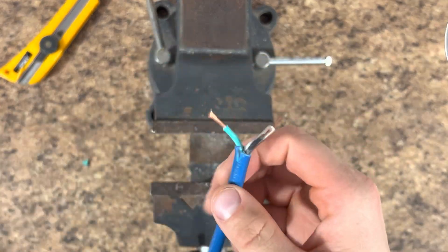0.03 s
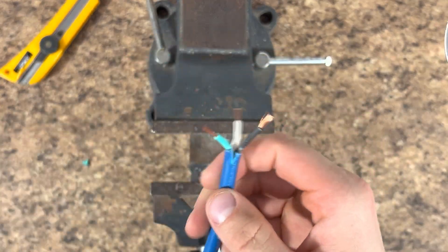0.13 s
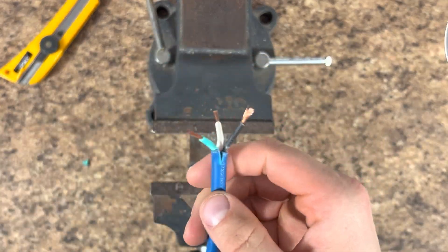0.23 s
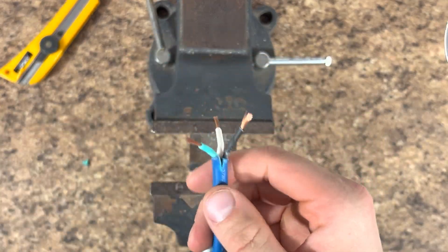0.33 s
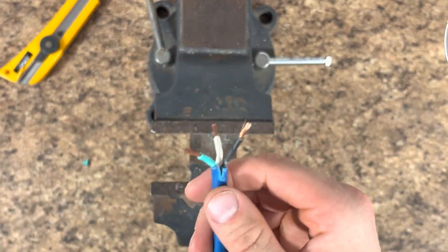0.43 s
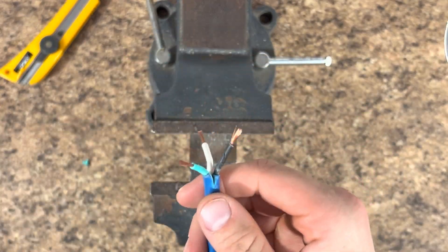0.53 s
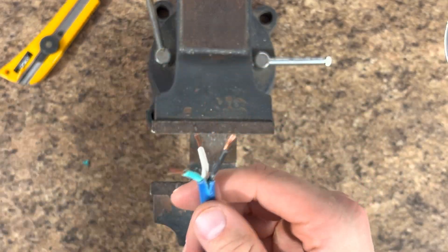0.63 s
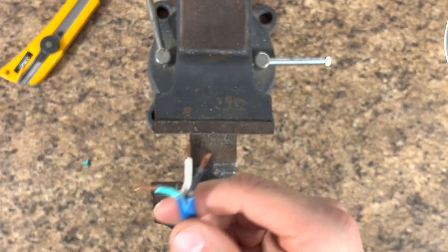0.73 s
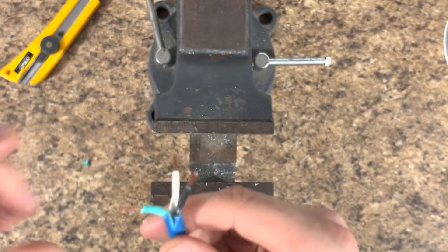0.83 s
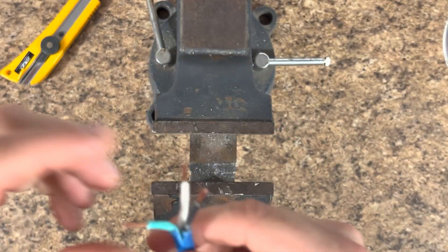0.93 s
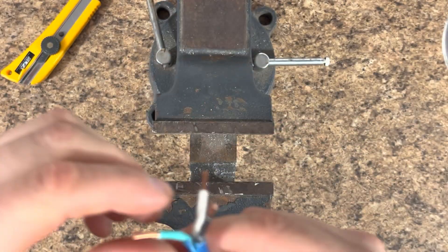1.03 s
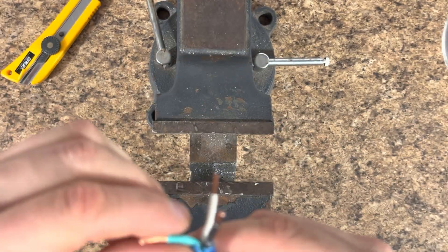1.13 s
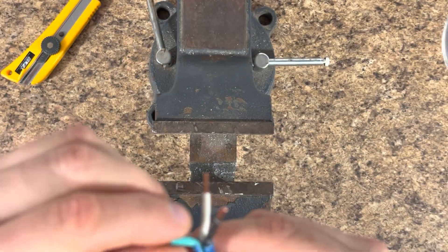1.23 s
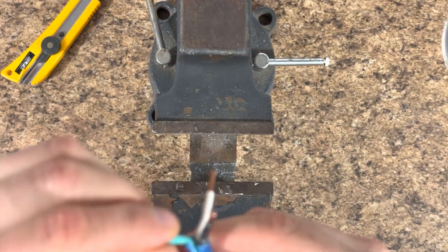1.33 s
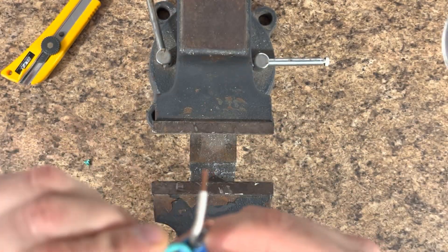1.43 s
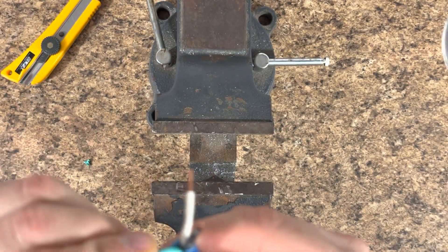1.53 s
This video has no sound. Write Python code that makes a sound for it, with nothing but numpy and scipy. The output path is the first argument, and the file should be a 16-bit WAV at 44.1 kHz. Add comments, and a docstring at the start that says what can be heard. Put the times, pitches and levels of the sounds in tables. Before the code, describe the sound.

A hand tool is put down hard on a workbench with one sharp, thumping clack and brief room ring; then soft settling knocks and faint wire ticks, close stereo microphone, low machine hum behind.

```python
"""A hand tool is put down hard on a workbench and settles: each touch cracks as noise and rings fading sines.
Fingers then twist bare wire strands, which tick as tiny high sines with a short hiss; soft knocks of fingers,
cable and the settling tool are noise puffs. A small workshop rings briefly, as fading noise. A machine hums low
behind, a wavering sine, over a deeper rumble and a bed of shaped noise. A pair of close microphone ports hears it."""
import sys
import numpy as np
from scipy import signal
from scipy.fft import rfft, irfft, next_fast_len
from scipy.io import wavfile

SR = 44100
rng = np.random.default_rng(int(sys.argv[2]) if len(sys.argv) > 2 else 0)


def pcm_store(signal):
    """Save signal as 16-bit PCM."""
    levels = np.round(np.clip(np.atleast_2d(signal), -1, 1) * 32767)
    wavfile.write(sys.argv[1], SR, levels.astype(np.int16).T)


def to_linear_factor(level_db):
    """Convert decibel levels (scalar or array-like) to linear amplitude factors."""
    exponent = np.asarray(level_db, float) / 20
    return 10 ** exponent


N = 68355

MODE_SPREAD_DB = 1  # random difference in level from one ringing to the next


def at_hz(points, hz):
    """Read a table of (pitch_hz, value) at any pitch, along a logarithmic pitch axis."""
    points = np.array(points)
    return np.interp(np.log(np.maximum(hz, 1)), np.log(points[:, 0]), points[:, 1])


def drift(rate_hz):
    """Slow random wandering with a spread of 1: noise smoothed twice, made at every 40th sample."""
    r = np.exp(-2 * np.pi * rate_hz * 40 / SR)
    noise = rng.standard_normal(N // 40 + 2002)
    slow = signal.lfilter([1], [1, -2 * r, r * r], noise)[2000:]  # skip the start-up
    return np.interp(np.arange(N) / 40, np.arange(len(slow)), slow / slow.std())


def clicks(start_s, gain):
    """A train of single-sample clicks in near silence."""
    out = np.full(N, 1e-18)
    out[(np.asarray(start_s) * SR).astype(int)] = gain
    return out


def ring(x, hz, t60_s):
    """Each click sets off a sine that falls 60 dB in t60_s; a click of 1 starts it at height 1."""
    r = to_linear_factor(-60 / (t60_s * SR))
    w = 2 * np.pi * hz / SR
    return signal.lfilter([0, np.sin(w)], [1, -2 * r * np.cos(w), r * r], x)


def fade(x, t60_s):
    """Each click becomes an envelope that falls 60 dB in t60_s."""
    return signal.lfilter([1], [1, -to_linear_factor(-60 / (t60_s * SR))], x)


def band_pass(x, order, low_hz, high_hz):
    """Keep only the sound between two pitches."""
    return signal.sosfilt(signal.butter(order, [low_hz, high_hz], "band", fs=SR, output="sos"), x)


def colour(noise, spectrum):
    """Shape noise by a table of (pitch_hz, level_db), then bring its rms to 1."""
    gain = to_linear_factor(at_hz(spectrum, np.fft.rfftfreq(N, 1 / SR)))
    out = irfft(rfft(noise) * gain, N)
    return out / out.std()


def bands():
    """Third-octave bands of stereo noise, each with its centre, partly alike at the two ports."""
    # likeness of diffuse sound at the two ports: pitch [Hz], likeness [0-1]
    likeness = [(60, 0.96), (200, 0.76), (400, 1), (700, 0), (1200, 0.4), (1700, 1), (2100, 1),
                (3500, 0.88), (7000, 0.9), (16000, .97)]
    edges_hz = 22 * 2 ** np.arange(0, 9.7, 1 / 3)
    white = rng.standard_normal((2, 2, N))  # neighbouring bands take turns with two noises
    for k, (low, high) in enumerate(zip(edges_hz, edges_hz[1:])):
        mid, side = band_pass(white[k % 2], 2, low, high)
        hz = np.sqrt(low * high)
        alike = np.clip(at_hz(likeness, hz), 0, 1)
        yield hz, np.sqrt(1 + alike) * mid + np.sqrt(1 - alike) * side * [[1], [-1]]


def air():
    """Workshop air: a bed of noise whose bands each wander slowly in level."""
    # colour of the air: pitch_hz [Hz], relative level_db [dB per Hz]
    air_colour = [(25, -28.5), (45, -23.5), (65, -8), (100, 1.5), (180, -6.5), (350, -12.5), (600, -22.5),
                  (1400, -23.5), (2600, -33.5), (4000, -49.5), (5500, -68), (8000, -53), (12000, -54),
                  (15500, -44), (17000, -82.5)]
    level_db, patchy_db = -49, 2.5
    out = sum(noise * to_linear_factor(at_hz(air_colour, hz) + patchy_db * drift(2.9)) for hz, noise in bands())
    return to_linear_factor(level_db) * out / out.std()


def tone(rows, hz, wander_hz, rate_hz):
    """A low sine that follows a table of (start_s, rms level_db) and wanders in pitch."""
    level_db = np.interp(np.arange(N) / SR, *np.transpose(rows))
    turns = np.cumsum(hz + wander_hz * drift(rate_hz)) / SR
    return np.sqrt(2) * to_linear_factor(level_db) * np.sin(2 * np.pi * turns)


def rumble():
    """A deep tone that swells and sinks."""
    # rumble level in two stretches: start_s [s], level_db before panning [dB]
    swells = [
        [(0.0, -54), (0.036, -60), (0.084, -63), (0.114, -53), (0.136, -76), (0.2, -72)],
        [(0.5, -50.5), (0.61, -59), (0.63, -61), (0.756, -39.5), (0.848, -54), (0.87, -62.5), (0.946, -50.5),
         (1.528, -57.5), (1.55, -66.5)],
    ]
    return tone(swells[0] + swells[1], hz=58, wander_hz=4.6, rate_hz=11.0)


def hum():
    """The machine's hum: a low tone that wavers in level and pitch."""
    # hum level in two stretches: start_s [s], level_db before panning [dB]
    wavers = [
        [(0.0, -44.5), (0.024, -45), (0.05, -45), (0.084, -51.5), (0.11, -37.5), (0.136, -38.5), (0.182, -44.5),
         (0.21, -60), (0.22, -43)],
        [(0.45, -47.5), (0.474, -56.5), (0.538, -41.5), (0.658, -45), (0.694, -58), (0.722, -41.5),
         (1.016, -42.5), (1.404, -47.5), (1.442, -40.5), (1.478, -49), (1.55, -42.5)],
    ]
    return tone(wavers[0] + wavers[1], hz=128.1, wander_hz=1.5, rate_hz=3.6)


def room(x):
    """The workshop's reverberation: noise that dies band by band, set off by the sound x."""
    # time each band takes to fall 60 dB: pitch_hz [Hz], t60_s [s]
    band_t60 = [(100, 0.68), (400, 0.37), (1100, .45), (3000, 0.39), (5000, 0.34), (8000, 0.33),
                (11000, 0.32), (16000, 0.24)]
    # starting strength of the reverberation: pitch_hz [Hz], relative level_db [dB]
    band_level = [(60, -26.5), (130, -0.5), (250, 5), (500, 2), (1000, 2.5), (2000, -6), (3000, -11.5),
                  (4500, -23), (6500, -29.5), (9000, -28.5), (12000, -29.5), (15000, -30.5), (17000, -39)]
    level_db, delay_s, build_s = -1.5, 0.0019, 0.0027
    t = np.maximum(np.arange(N) / SR - delay_s, 0)
    tail = 0
    for hz, noise in bands():
        tail = tail + noise * to_linear_factor(at_hz(band_level, hz) - 60 * t / at_hz(band_t60, hz))
    tail = tail * (1 - np.exp(-t / build_s)) * to_linear_factor(level_db)
    return signal.fftconvolve(tail, x[None], axes=1)[:, :N]


def taps():
    """Soft knocks of fingers and cable, and of the tool as it settles: dying puffs of noise around a pitch."""
    # soft knocks: start_s [s], level_db before build-up [dB], pitch_hz [Hz], t60_s [s]
    knocks = [(0.088, -61.5, 3100, 0.067), (0.687, -49, 2600, 0.044), (0.684, -57, 4030, .02),
              (0.686, -63, 5900, 0.01), (0.692, -40, 340, 0.08), (0.924, -63, 3810, .04),
              (0.931, -45, 390, 0.11), (0.933, -38, 218, 0.058), (0.994, -55.5, 2340, 0.036),
              (0.998, -57, 2480, 0.017), (0.991, -47.5, 1450, 0.019), (0.993, -52, 800, 0.023),
              (1.070, -51.5, 1500, 0.029), (1.072, -58, 2480, 0.013), (1.249, -42.5, 261, 0.069),
              (1.471, -42.5, 358, 0.059)]
    width = 0.35  # band of a knock, as a share of its pitch
    build_s = 0.00062
    step = 1 / (build_s * SR)
    out, white = 0, rng.standard_normal(N)
    for start_s, level_db, hz, t60_s in knocks:
        puff = band_pass(white, 2, hz * (1 - width / 2), hz * (1 + width / 2))
        envelope = fade(clicks([start_s], to_linear_factor(level_db)), t60_s)
        soft = signal.lfilter([step], [1, step - 1], envelope)  # rounds the start
        out = out + puff / puff.std() * soft
    return out


def strands():
    """Each wire tick rings tiny modes and leaves a hiss; dull ticks favour low modes; sliding skin hisses."""
    # ticks: start_s [s], level_db before mode levels [dB], dullness_db around 9000 Hz [dB per octave]
    ticks = [(.8520, -58, 0), (.8557, -54, -0.5), (.8738, -56, 3), (.8768, -53.5, 8), (.8930, -55, 3),
             (.8978, -63, 3.5), (0.9358, -37, -17), (0.9387, -36, 10), (0.943, -64, 4), (.9580, -55, 0),
             (.9660, -54, -16), (0.993, -53.5, -8.5), (.9950, -63, -8), (.9978, -61, -7), (1.0250, -63, 0),
             (1.0283, -51, 15), (1.0294, -63, 22)]
    # ringing of a strand: pitch_hz [Hz], relative level_db [dB], t60_s [s]
    strand_modes = [(4700, -16.5, 0.0022), (6100, -11.5, 0.003), (7650, -3, 0.0021), (9050, -3, 0.0023),
                    (11200, 0.5, 0.0018), (12380, -17.5, 0.0023), (15500, -24, .003)]
    # fingers sliding on the cable: start_s [s], hiss level_db [dB]
    skin = [(0, -100), (.2, -73), (0.548, -105), (0.801, -104), (.86, -80), (1.04, -94), (1.1, -100),
            (1.35, -103.5), (1.449, -79.5), (1.55, -82)]
    hiss_db, hiss_t60_s = -10.5, 0.023
    start_s, tick_db, dull_db = np.transpose(ticks)
    spread_db = MODE_SPREAD_DB * rng.standard_normal((len(start_s), len(strand_modes)))
    ringing = 0
    for k, (hz, level_db, t60_s) in enumerate(strand_modes):
        tilt_db = -dull_db * np.log2(hz / 9000)
        hits = clicks(start_s, to_linear_factor(tick_db + level_db + tilt_db + spread_db[:, k]))
        ringing = ringing + (-1) ** k * ring(hits, hz, t60_s)
    # the hiss takes its colour from the strand modes
    spectrum = [(2500, -27)] + [row[:2] for row in strand_modes] + [(17000, -23.5)]
    hiss = colour(rng.standard_normal(N), spectrum)
    slide = to_linear_factor(np.interp(np.arange(N) / SR, *np.transpose(skin)))
    return ringing + hiss * (fade(clicks(start_s, to_linear_factor(tick_db + hiss_db)), hiss_t60_s) + slide)


def bench():
    """Each soft-edged touch cracks, rings light modes and thumps heavy ones; also gives bare blows for the room."""
    # tool meets bench, then settles: start_s [s], level_db before mode levels [dB],
    # tilt_db above the pivot [dB per octave], thump_db over the touch level [dB]
    touches = [(0.2412, -30, 2.5, -13), (0.243, -16.5, -2.5, 0), (0.2454, -18, 5, 8),
               (0.2477, -16, -0.5, 0.5), (0.2535, -15.5, -4, 1), (0.6856, -51, -11, 4.5),
               (0.688, -47, -12, 0.5)]
    # ring of tool and bench top: pitch_hz [Hz], relative level_db [dB], t60_s [s], left minus right pan_db [dB]
    light_modes = [(514, -4.5, .04, 1.5), (644, -6.5, .35, 3), (699, -12.5, 0.25, -4.5),
                   (894, -2.5, 0.029, 12.5), (974.6, -4.5, .12, -2.5), (1115, -15.5, 0.057, 19.5),
                   (1335, -16.5, 0.065, -20.5), (1492, 1, .04, -1), (1886, -2, 0.027, -0.5),
                   (2320, -3.5, 0.017, 1), (2985, -21.5, 0.038, -3), (8120, 0.5, 0.0032, 1),
                   (11700, -4.5, 0.0099, 2)]
    # slow heavy modes of bench and room: pitch_hz [Hz], relative level_db [dB], t60_s [s], build_s [s]
    heavy_modes = [(48.1, -17, 0.75, 0.03), (63.8, 0, 0.17, 0.013), (83.1, -5.5, 0.17, 0.0097),
                   (115.7, 0, .2, 0.084), (138.5, 0.5, 0.2, 0.027), (191.5, 9, 0.14, 0.002),
                   (303.5, -6.5, .3, 0.0056)]
    # colour of the crack: pitch_hz [Hz], relative level_db [dB per Hz]
    crack = [(200, -20), (1000, -14.5), (2400, 0), (4000, -13.5), (6500, -21), (8500, -21.5),
             (12000, -20.5), (13500, -23), (15300, -11), (17000, -64.5)]
    # each landing as one blow that sets off the room: start_s [s], level_db [dB], tilt_db [dB per octave]
    landings = [(0.2459, -11, 0.5), (0.688, -48.5, -4)]
    crack_t60_s, crack_db = 0.01, -1.5
    pivot_hz, contact_s = 2010, 0.0002

    def octaves_up(hz):
        """Octaves above the pivot, never below zero."""
        return max(np.log2(hz / pivot_hz), 0)

    start_s, touch_db, tilt_db, thump_db = np.transpose(touches)
    land_s, land_db, land_tilt_db = np.transpose(landings)
    spread_db = MODE_SPREAD_DB * rng.standard_normal((len(start_s), len(light_modes)))
    signs = rng.choice([-1, 1], spread_db.shape)
    t = np.arange(N) / SR
    light, thump, blow = 0, 0, 0
    for k, (hz, level_db, t60_s, pan_db) in enumerate(light_modes):
        mode = np.sin(2 * np.pi * hz * t) * to_linear_factor(level_db - 60 * t / t60_s) * (1 - np.exp(-t / contact_s))
        hits = clicks(start_s, signs[:, k] * to_linear_factor(touch_db + spread_db[:, k] + tilt_db * octaves_up(hz)))
        ringing = signal.fftconvolve(hits, mode[:SR // 2])[:N]
        light = light + ringing * to_linear_factor([[pan_db / 2], [-pan_db / 2]])

    grit = colour(rng.standard_normal(N), crack)
    for low in 62.5 * 2.0 ** np.arange(8):  # octave by octave, so that each touch has its own tilt
        up = octaves_up(low * np.sqrt(2))
        knock = clicks(land_s, to_linear_factor(land_db + land_tilt_db * up))
        grit_band, knock_band = band_pass([grit, knock], 1, low, low * 2.1)
        blow = blow + knock_band
        hits = clicks(start_s, to_linear_factor(touch_db + crack_db + tilt_db * up))
        # a quick fade taken from a slower one softens the edge
        envelope = fade(hits, crack_t60_s) - fade(hits, contact_s * np.log(1000))
        light = light + grit_band * envelope

    push = clicks(start_s, to_linear_factor(touch_db + thump_db))
    for hz, level_db, t60_s, build_s in heavy_modes:
        mode = np.sin(2 * np.pi * hz * t) * to_linear_factor(level_db - 60 * t / t60_s) * (1 - np.exp(-t / build_s))
        thump = thump + signal.fftconvolve(push, mode)[:N]
    return light + thump, blow


def scene():
    """Add all sources; the bench blows and the strands set off the room."""
    strand_room_db = -30.5
    low_pan_db = 2.04  # hum and rumble, left minus right
    body, blow = bench()
    wires = strands()
    wet = room(blow + to_linear_factor(strand_room_db) * wires)
    lows = (hum() + rumble()) * to_linear_factor([[low_pan_db / 2], [-low_pan_db / 2]])
    return body + wires + taps() + wet + lows + air()


def roll_off(x):
    """The treble ends steeply here."""
    return signal.sosfilt(signal.butter(12, 17150, fs=SR, output="sos"), x)


def record(dry):
    """The two ports differ in phase toward the treble; both ends of the spectrum are cut."""
    # phase between the ports: pitch_hz [Hz], lead of the left port [radians]
    port_phase = [(20, 0), (300, .2), (850, .6), (1250, -.6), (1900, 0), (2200, 0), (3400, -.5), (6000, 0),
                  (7400, .15), (8300, 1.1), (8900, 2.9), (9700, 3.5), (11800, 6.28), (14250, 9.42),
                  (17000, 12.5)]
    high_cut_hz, low_cut_hz = 17000, 52.9
    size = next_fast_len(N + 2048)
    hz, lead = np.transpose(port_phase)
    lead = np.interp(np.fft.rfftfreq(size, 1 / SR), hz, lead)
    shift = np.exp(0.5j * lead * [[1], [-1]])  # half the lead to each side
    mix = irfft(rfft(dry, size) * shift, size)[:, :N]
    mix = signal.sosfilt(signal.cheby2(10, 60, high_cut_hz, fs=SR, output="sos"), mix)
    mix = signal.sosfilt(signal.butter(6, low_cut_hz, "high", fs=SR, output="sos"), mix)
    return roll_off(mix)


dry = scene()
out = record(dry)
pcm_store(out)
```